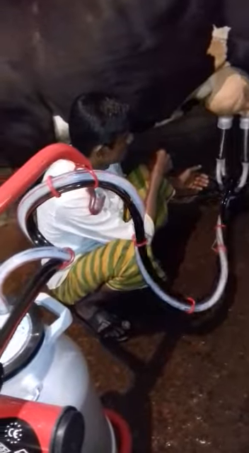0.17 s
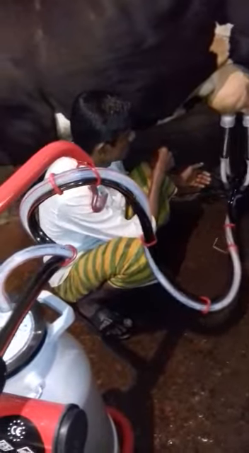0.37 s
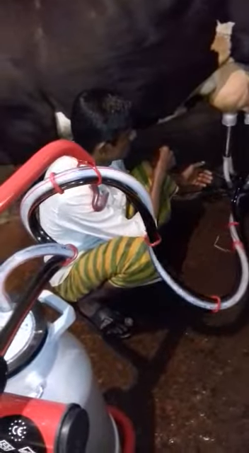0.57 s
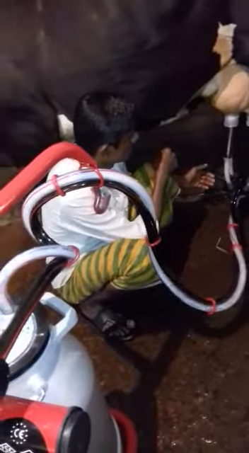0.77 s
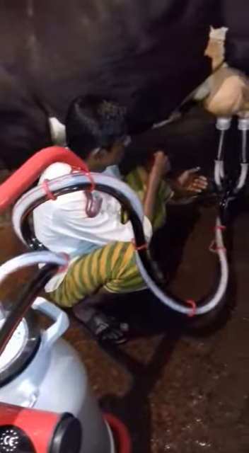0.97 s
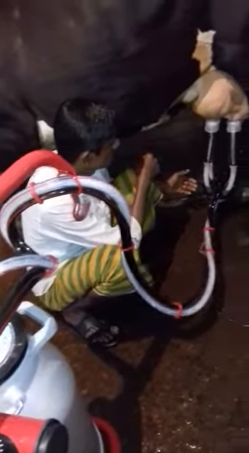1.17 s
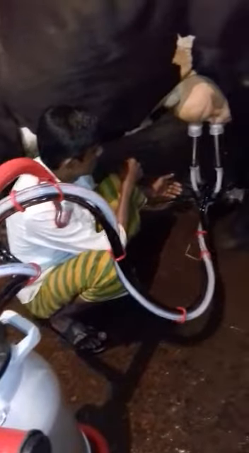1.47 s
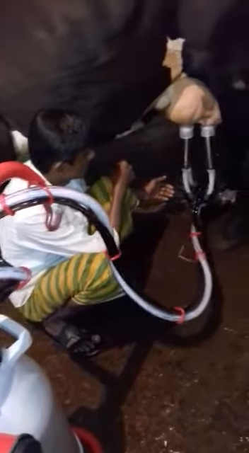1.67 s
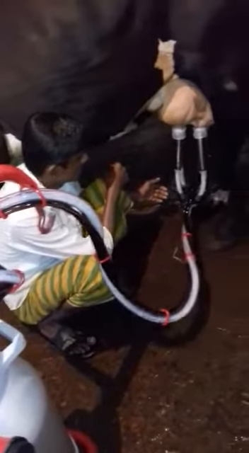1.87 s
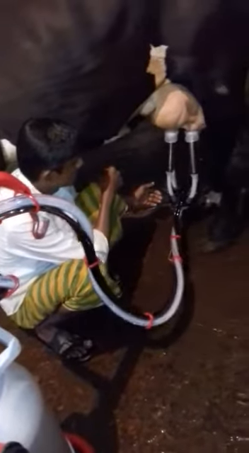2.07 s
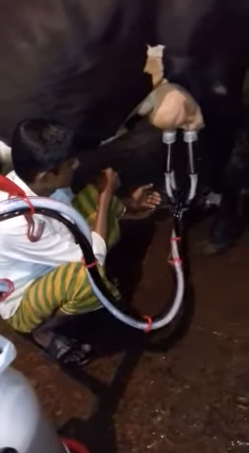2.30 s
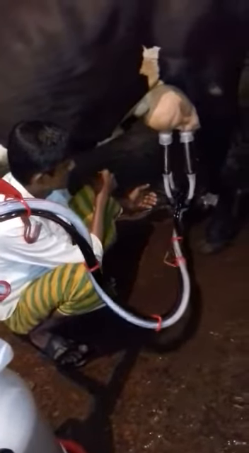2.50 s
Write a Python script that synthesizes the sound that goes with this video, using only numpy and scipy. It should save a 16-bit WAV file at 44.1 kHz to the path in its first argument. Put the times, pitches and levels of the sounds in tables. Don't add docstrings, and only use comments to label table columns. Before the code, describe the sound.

Continuous rough motor and vacuum pump noise, mostly airy hiss with fast fluttering metallic knocks, crossed by crisp evenly spaced valve ticks and one faint floor thump midway; captured close by in a cattle shed.

```python
import sys
import numpy as np
from scipy import signal
from scipy.fft import rfft, irfft
from scipy.io import wavfile
from scipy.ndimage import uniform_filter1d

SR = 44100
rng = np.random.default_rng(int(sys.argv[2]) if len(sys.argv) > 2 else 0)


def nominal_scale(level):
    x = np.asarray(level, float) / 20
    return 10 ** x


def master(y):
    cut = np.clip(np.atleast_2d(y).T, -1, 1)
    pcm = np.round(cut * 32767)
    wavfile.write(sys.argv[1], SR, pcm.astype(np.int16))


N = 116424
T = np.arange(N) / SR
F = np.arange(N // 2 + 1) * SR / N

SHAFT_HZ, VANES = 24.125, 4
STROKE_HZ = SHAFT_HZ * VANES

STROKE_HARMONICS = [-57, -44, -52.5, -41.5, -40.5, -43.5, -54]
HIGH_HARMONICS = (16, 17, 22)
HIGH_HARMONICS_DB = (-52, -55, -50)
# pitch_hz, level_db
FRAME_TONES = [(85.3, -64.5), (204.2, -55), (217.2, -66), (265.4, -58), (313.7, -62), (410.1, -62),
               (565, -62)]
# after_turn_start_strokes, level_db
BARREL_HITS = [
    (.445, -9),
    (1.43, 0),
    (2.44, -17),
    (3.43, -1),
    (3.97, -14),
]
# after_turn_start_strokes, level_db
COVER_HITS = [
    (.02, -9),
    (1.0, -2),
    (2.0, -9),
    (2.93, 0),
    (3.25, -8),
]
# pitch_hz, level_db, t60_s
BARREL_MODES = [(1030, -46.5, .03), (1190, -40, .04), (1270, -47, .05)]
# pitch_hz, level_db, t60_s
COVER_MODES = [(2570, -43, .02), (3310, -36, .025), (3410, -36.5, .02), (3600, -39.5, .02)]
# pitch_hz, width_hz, level_db
HOUSING_RESONANCES = [(1146, 330, -41), (1827, 630, -40.5), (2346, 600, -36.5), (2693, 530, -33.5),
                      (3350, 550, -34.5), (3735, 680, -36), (4697, 1130, -28), (5406, 1020, -33.5)]
# pitch_hz, width_hz, level_db
JET_RESONANCES = [(6503, 1630, -24.5), (7054, 690, -22.5), (7715, 790, -23), (8380, 1500, -21.5),
                  (8767, 1200, -21), (10070, 1010, -24.5), (11410, 1800, -26.5), (12970, 760, -33.5),
                  (13900, 1300, -32.5), (15200, 1500, -31)]
# pitch_hz, level_db (per Hz)
RUMBLE_CURVE = [(30, -40), (60, -16), (82, -23), (110, -19), (200, -6), (400, -5), (800, 2), (2200, -1)]
# start_s, level_db
PULSATOR_TICKS = [
    (.4912, -12.5),
    (1.0364, -8),
    (1.5527, -9),
    (2.0979, -7.5),
    (2.6135, -9),
]
# after_tick_s, level_db
VALVE_CONTACTS = [
    (0, 0),
    (.0047, -2),
    (.0088, -7),
]
# pitch_hz, level_db, t60_s
VALVE_MODES = [(2520, -5, .014), (2850, -5, .013), (3500, -11, .007), (4300, -6, .013), (4750, -9, .01)]


def unit(x):
    return x / np.sqrt(np.mean(x ** 2))


def band(x, hz, width_hz, order=1):
    detune = (F ** 2 - hz ** 2) / (np.maximum(F, 1) * width_hz)
    return irfft(rfft(x) / (1 + 1j * detune) ** order, N)


def walk(rate_hz):
    span = int(SR / rate_hz)
    once = uniform_filter1d(rng.standard_normal(N), span)
    return unit(uniform_filter1d(once, span))


def fade(seconds, t60_s):
    return np.exp(-np.log(1000) * seconds / t60_s)


def clicks(times_s, sizes):
    fine = np.zeros(N * 8)
    inside = (times_s >= 0) & (times_s < (N - 1) / SR)
    np.add.at(fine, (times_s[inside] * SR * 8).astype(int), sizes[inside])
    return rfft(fine)[:len(F)]


def ring(spectrum, hz, t60_s):
    return irfft(spectrum * rfft(np.sin(2 * np.pi * hz * T) * fade(T, t60_s)), N)


def hum():
    stroke = T * STROKE_HZ
    harmonics = list(enumerate(STROKE_HARMONICS, start=1)) + list(zip(HIGH_HARMONICS, HIGH_HARMONICS_DB))
    partials = []  # (phase in cycles, level dB)
    for k, db in harmonics:
        if k <= 3:
            cycles = k * (stroke - 0.69) + 0.42
        else:
            cycles = k * (stroke - 0.61) + 0.45 - 0.05 * (k - 5) ** 2
        partials.append((cycles, db))
    for hz, db in FRAME_TONES:
        partials.append((hz * T + rng.random(), db))
    return sum(np.sqrt(2) * nominal_scale(db + 0.51 * walk(14)) * np.cos(2 * np.pi * cycles) for cycles, db in partials)


def knocks(pattern, modes):
    scatter_db, jitter_s = 1.8, 0.00003
    turns = range(int(N / SR * SHAFT_HZ) + 1)
    strokes, db = np.array([(turn * VANES + at, level) for turn in turns for at, level in pattern]).T
    chance = rng.standard_normal((len(strokes), 2))
    times_s = strokes / STROKE_HZ + jitter_s * chance[:, 0]
    hits = clicks(times_s, nominal_scale(db + scatter_db * chance[:, 1]))
    out = np.zeros(N)
    for hz, mode_db, t60_s in modes:
        out += nominal_scale(mode_db) * unit(band(ring(hits, hz, t60_s), hz, 0.15 * hz))
    return out


def rush(resonances, puff_at, puff_share, puff_depth, flicker_db):
    since_puff = (T * STROKE_HZ - puff_at) % 1
    puff = 1 + puff_depth * np.exp(-since_puff / puff_share)
    swell_db = 0.44 * walk(18)
    air = np.zeros(N)
    for hz, width_hz, db in resonances:
        hiss = unit(band(rng.standard_normal(N), hz, width_hz, order=2))
        air += nominal_scale(db + swell_db + flicker_db * walk(36)) * hiss
    return unit(puff) * air


def pump_air():
    housing = rush(HOUSING_RESONANCES, puff_at=0.93, puff_share=0.3, puff_depth=0.4, flicker_db=1.0)
    jet = rush(JET_RESONANCES, puff_at=0.57, puff_share=0.13, puff_depth=0.55, flicker_db=0.58)
    return signal.sosfilt(signal.butter(2, 600, "high", fs=SR, output="sos"), housing + jet)


def rumble():
    hz, db = np.array(RUMBLE_CURVE).T
    curve_db = np.interp(np.log(np.maximum(F, 1)), np.log(hz), db)
    gain = nominal_scale(curve_db) / (1 + (F / 2200) ** 8)
    return nominal_scale(-38.5) * unit(irfft(rfft(rng.standard_normal(N)) * gain, N))


def pulsator():
    contacts = [(s + d, a + b) for s, a in PULSATOR_TICKS for d, b in VALVE_CONTACTS]
    times_s, db = np.array(contacts).T
    mix_db = rng.standard_normal((len(times_s), len(VALVE_MODES)))
    rings = np.zeros(N)
    for k, (hz, mode_db, t60_s) in enumerate(VALVE_MODES):
        hits = clicks(times_s, nominal_scale(db + mix_db[:, k]))
        rings += nominal_scale(mode_db) * band(ring(hits, hz, t60_s), hz, hz / 2, order=2)
    spit = np.zeros(N)
    for start_s, tick_db in PULSATOR_TICKS:
        spit += nominal_scale(tick_db - 13) * (T > start_s) * fade(np.abs(T - start_s), 0.03)
    return rings + spit * unit(band(rng.standard_normal(N), 3600, 2000, order=3))


def thump():
    start_s, length_s = 1.095, 0.14
    shape = np.sin(np.pi * np.clip((T - start_s) / length_s, 0, 1)) ** 0.5
    return nominal_scale(-42) * shape * unit(band(rng.standard_normal(N), 320, 360, order=2))


def scene():
    casing = knocks(BARREL_HITS, BARREL_MODES) + knocks(COVER_HITS, COVER_MODES)
    mono = hum() + casing + pump_air() + rumble() + pulsator() + thump()
    return np.array([mono, mono])


def band_limit(x):
    return signal.sosfilt(signal.butter(12, 15760, fs=SR, output="sos"), x)


def record(dry):
    port_hiss = nominal_scale(-43) * rng.standard_normal(N)
    port_ring = nominal_scale(-7.5) * band(dry[0] + port_hiss, 7950, 920)
    ports = dry + port_ring * np.array([[-1], [1]])
    both = signal.sosfilt(signal.butter(2, 35, "high", fs=SR, output="sos"), ports)
    ceiling = 1.35
    return band_limit(ceiling * np.tanh(both / ceiling))


dry = scene()
out = record(dry)
master(out)
```